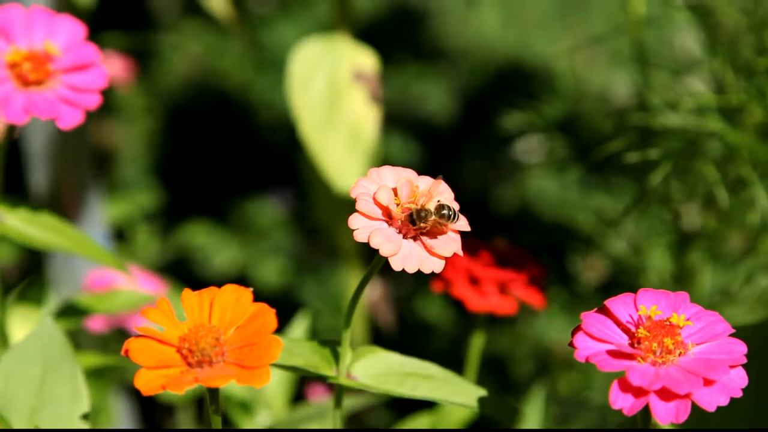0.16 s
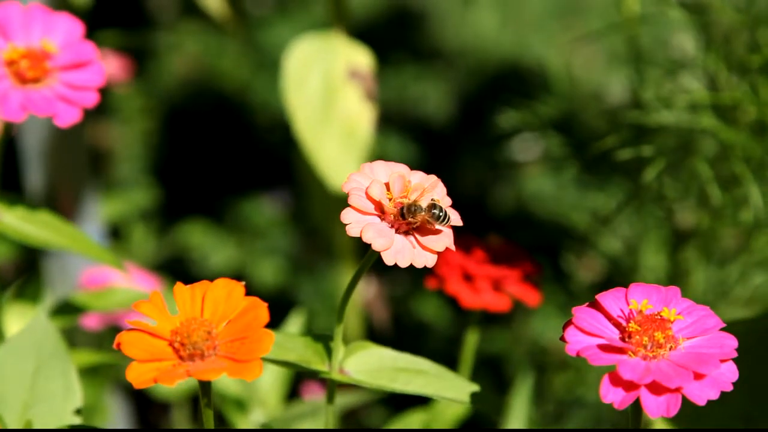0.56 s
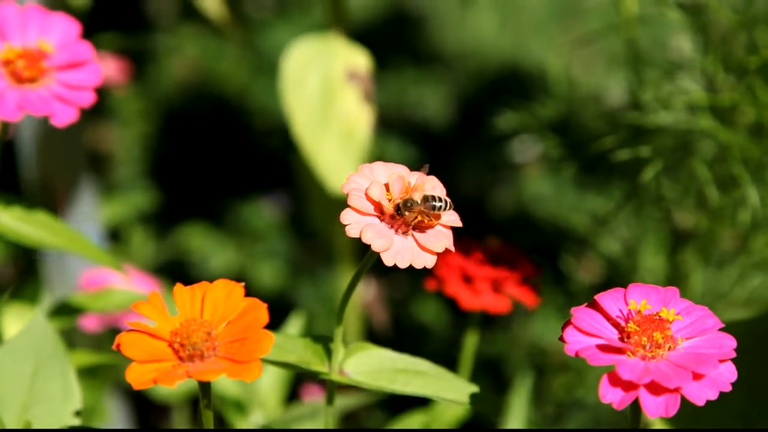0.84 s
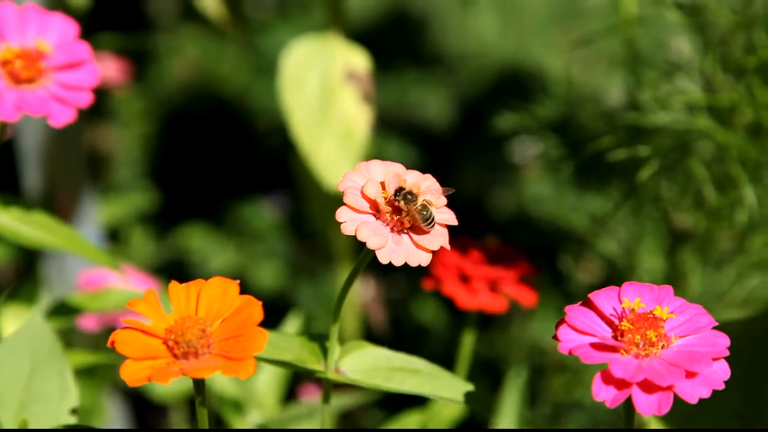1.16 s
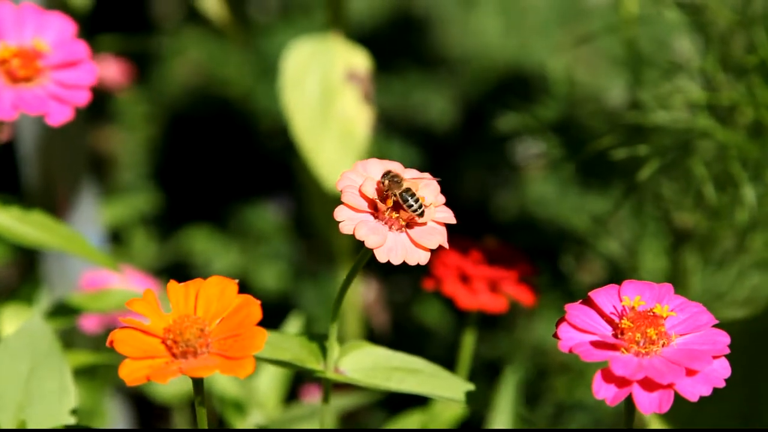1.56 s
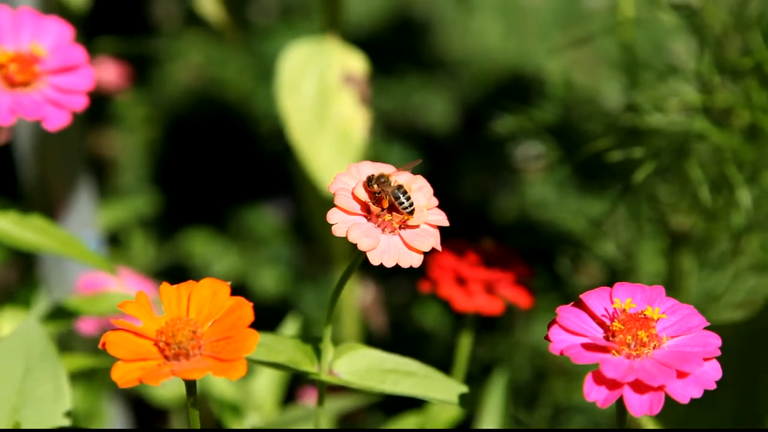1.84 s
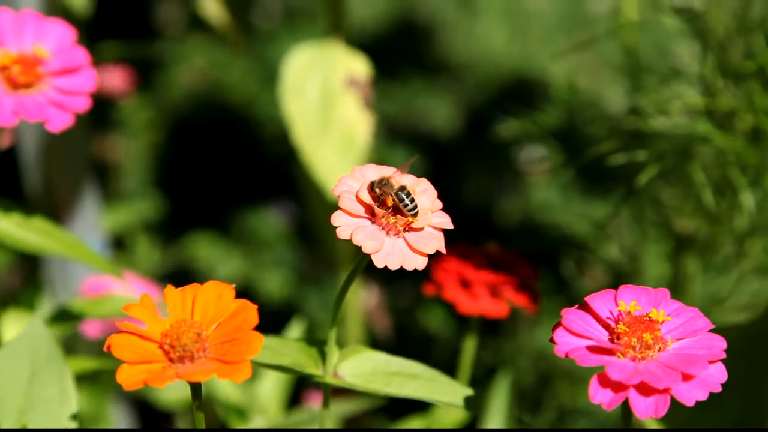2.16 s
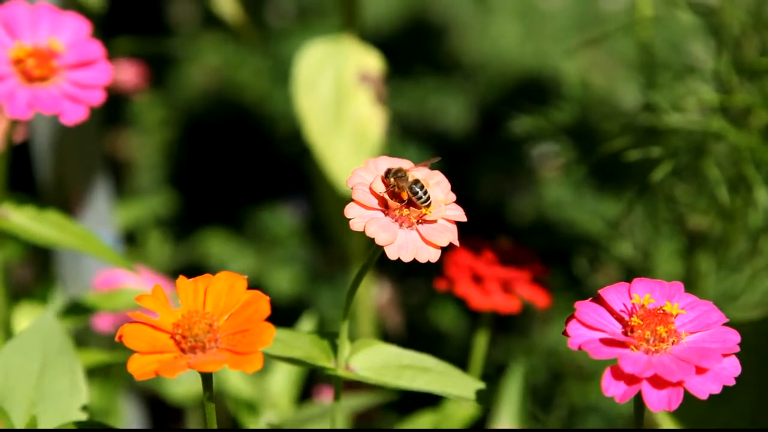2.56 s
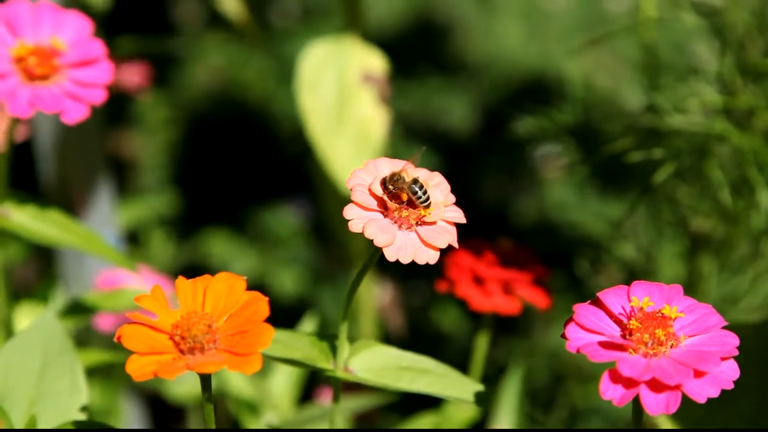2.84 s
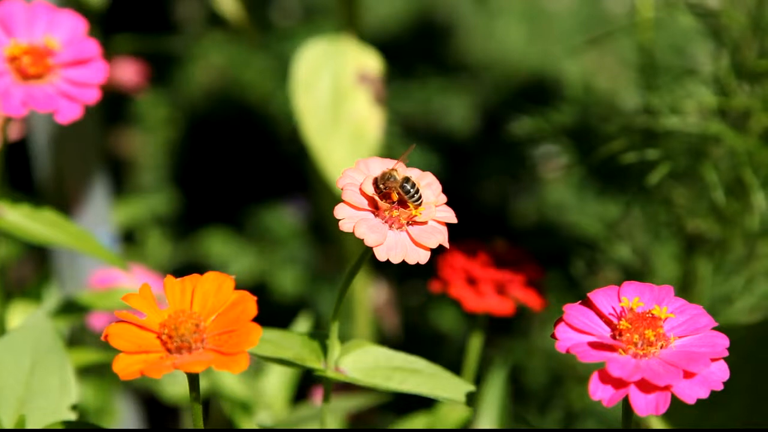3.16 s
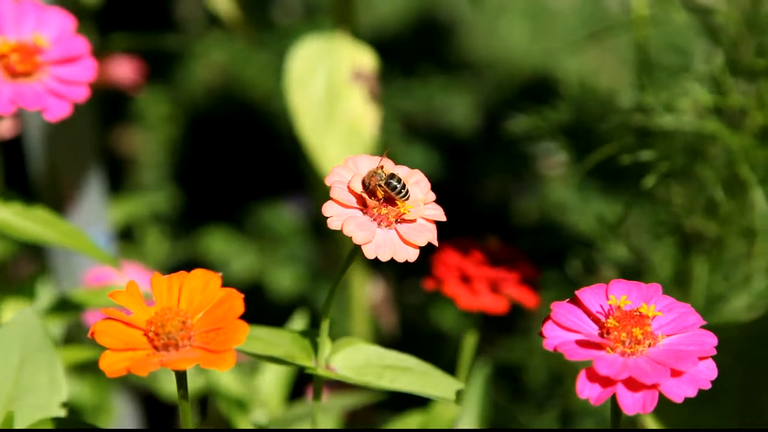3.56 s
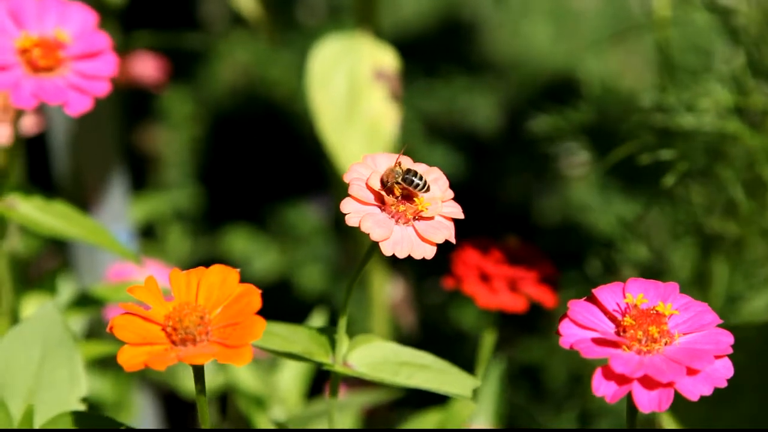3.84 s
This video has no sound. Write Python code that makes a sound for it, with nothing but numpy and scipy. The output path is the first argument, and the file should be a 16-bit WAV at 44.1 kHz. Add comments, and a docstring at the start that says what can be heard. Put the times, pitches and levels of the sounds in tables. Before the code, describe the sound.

A loud, close cicada buzzes shrilly, stops dead after a second, leaving faint camera whirring and ticking.

```python
"""From the start, a camera's lens drive whirs (noise through resonances) and ticks (short bursts of noise),
with a thin whine and two steady tones (sines), far insects, traffic, a low hum and hiss (filtered noise).
Almost at once a close cicada buzzes, about fifty syllables a second, each a volley of clicks echoed by foliage.
It slows and stops dead after about a second; the whine cuts out halfway.
Later a soft bump and its rebound ring the camera body; at the very end the cicada softly starts again."""
import sys
import numpy as np
from scipy import signal
from scipy.fft import rfft, irfft
from scipy.io import wavfile
from scipy.ndimage import uniform_filter1d, minimum_filter1d

SR = 44100
rng = np.random.default_rng(int(sys.argv[2]) if len(sys.argv) > 2 else 0)


def digitize_waveform(pressure):
    """Quantize a signal to 16-bit integers and store it at the path in sys.argv[1].

    Rows of a 2-D input are taken as channels; values are limited to [-1, 1].
    """
    field = np.atleast_2d(pressure).T
    bounded = np.clip(field, -1, 1)
    quanta = np.round(bounded * 32767).astype(np.int16)
    wavfile.write(sys.argv[1], SR, quanta)


N = 176400

# Lens housing resonances: pitch_hz, width_hz, whir_level_db, tick_level_db (levels compare the rows)
HOUSING = [(1596, 118, -1, -10.5), (1798, 106, 0.5, 6), (1916, 83, -13.5, -10.5), (2225, 122, -4.5, -2),
           (2366, 104, -8.5, -2), (2551, 190, -4, -11), (2995, 89, -11, -3), (3334, 290, -13.5, 7),
           (3670, 226, -2.5, 9), (4085, 250, -18, -1), (4510, 530, -9, 3)]
# Loudness of the whir before its flutter: time_s, level_db
WHIR_LEVEL = [(0, -49), (.7, -49), (1.3, -47), (1.7, -48), (2.1, -46.5), (2.9, -48), (3.4, -47.5), (4, -46)]
WHIR_FLUTTER_DB, WHIR_FLUTTER_PER_S = 1.91, 45
# The lowest housing resonance throbs on its own
DRONE_HZ, DRONE_WIDTH_HZ, DRONE_THROB_DB, DRONE_THROB_PER_S = 1298, 124, 1.6, 30
# Loudness of that drone: time_s, level_db
DRONE_LEVEL = [(0, -52.5), (.45, -52), (.6, -57), (.8, -51.5), (.92, -46), (1.01, -44), (1.07, -54.5),
               (1.13, -48), (1.3, -47), (1.6, -51.5), (1.85, -52.5), (2.12, -48), (2.38, -53.5),
               (2.7, -49.5), (2.88, -48.5), (3.2, -51.5), (3.55, -49), (3.68, -46), (3.8, -50), (4, -51.5)]
# Small corrections of the lens drive, before the trim TICK_DB: start_s, level_db
TICKS = [(0.1077, -52), (0.131, -32.5), (0.3056, -38), (0.4, -34.5), (0.6029, -36), (0.634, -33),
         (0.7308, -36.5), (0.816, -36.5), (1.0409, -38), (1.129, -37), (1.1593, -33.5), (1.3334, -35),
         (1.3678, -35.5), (1.4132, -37), (1.4517, -32), (1.5882, -35.5), (1.748, -33), (1.8382, -39),
         (1.951, -34), (2.015, -34.5), (2.0397, -30.5), (2.1924, -35), (2.263, -30.5), (2.3442, -33.5),
         (2.3524, -35), (2.4053, -36.5), (2.4914, -34.5), (2.5232, -34), (2.5674, -35.5), (2.6502, -35),
         (2.7082, -41), (2.746, -34.5), (2.9493, -36), (3.039, -33), (3.0889, -34.5), (3.131, -35),
         (3.1688, -39), (3.2586, -34), (3.3393, -37), (3.3723, -33), (3.3948, -30), (3.4104, -32),
         (3.463, -36.5), (3.5016, -37), (3.5816, -37.5), (3.7223, -35), (3.7948, -32.5), (3.9659, -36)]
TICK_S, TICK_DB, TICK_HISS_DB = 0.0068, -6, -17
# Ticks are cut above this pitch, with a quieter uncut copy added
TICK_TOP_HZ, TICK_SPILL_DB = 4660, -8

# Partials of the thin whine: pitch_hz, level_db, beat_depth (0 to 1)
WHINE = [(4775, -69, .5), (4930, -61, .1), (5195, -67.5, .5), (5378, -66, .1), (5652, -72, .7),
         (5825, -78, .3), (6062, -73, .9), (6272, -76, .3), (6525, -78, .6), (6720, -78, .6)]
WHINE_BEAT_PER_S, WHINE_WANDER_HZ = 17, 3
WHINE_END_S, WHINE_FADE_S = 2.09, .06
# Steady tones of the camera's electronics: pitch_hz, level_db
STEADY_TONES = [(1953, -69), (15674, -70)]

# Loudness of the far insects: time_s, level_db
CHORUS_LEVEL = [(0, -66), (1.8, -64), (2.3, -60), (3, -60), (4, -58.5)]
CHORUS_HZ, CHORUS_WIDTH_HZ = 7310, 740
# Loudness of the distant traffic: time_s, level_db
TRAFFIC_LEVEL = [(0, -77), (1.0, -69), (1.5, -64), (2.5, -67), (2.95, -61), (3.4, -60.5), (4, -65)]
TRAFFIC_HZ, TRAFFIC_WIDTH_HZ = 504, 304
# Loudness of the low hum: time_s, level_db
HUM_LEVEL = [(0, -60.5), (1.0, -62), (1.8, -57.5), (2.4, -59), (3, -61.5), (4, -63)]
HUM_HZ, HUM_WIDTH_HZ = 57.4, 36
# Colour of the outdoor air noise: pitch_hz, level_db (compares the rows; AIR_DB sets the loudness)
AIR_COLOUR = [(20, -37), (35, -14), (55, -12.5), (80, -5.5), (130, -4), (220, -9.5), (400, -11),
              (600, -13.5), (900, -13.5), (2500, -13), (5000, -25.5), (6300, -19), (9000, -25),
              (12000, -30), (15500, -32)]
AIR_DB = -53.5

# Speed of the cicada's song: time_s, syllables_per_s
SONG_RATE = [(0.0, 51.5), (0.15, 51.4), (0.42, 51.0), (0.69, 50.3), (0.9, 48.8), (1.07, 45.5)]
FIRST_S, STOP_S = .0095, 1.075
# Loudness of the song: time_s, level_db
SONG_LEVEL = [(0, -20), (.3, -20), (.55, -20), (.7, -21), (.9, -19.5), (1.07, -20)]
RESTART_S, RESTART_PER_S, RESTART_DB = 3.932, 56, -49.5
# Ribs of the tymbal (the sound-making plate) buckling in turn: time_from_syllable_middle_ms, level_db
RIBS = [(-5.5, -5), (-3.5, -2.5), (-2.5, -1.5), (-2.0, -3), (-1.03, -2.5), (-0.04, 4), (0.9, 0),
        (1.9, -2.5), (2.5, -7)]
RIB_JITTER_MS, RIB_SCATTER_DB, SYLLABLE_JITTER_MS, SYLLABLE_SCATTER_DB = .2, .9, .45, .4
# Each click glides down in pitch as the rib gives way
CLICK_GLIDE_MS_PER_KHZ = .3
# Colour of one click: pitch_hz, level_db
TYMBAL_COLOUR = [(2500, -60), (4000, -64), (4700, -31.5), (5900, -23), (6250, -12.5), (6650, -13.5),
                 (7100, -3), (7500, -2), (8200, -3), (8700, -10.5), (9300, -11), (10150, -12.5),
                 (10600, -22), (11200, -27.5), (12200, -36.5), (13200, -31.5), (13600, -41), (14700, -40),
                 (15400, -37)]
# Ringing of the hollow abdomen, before ABDOMEN_DB: pitch_hz, width_hz, level_db
ABDOMEN = [(7525, 130, 0), (8020, 260, -8), (9292, 120, 2)]
ABDOMEN_DB = 2
# Reflections from near stems and leaves: delay_s, time_to_fall_60_db_s, level_db
NEAR_ECHO = (.002, .07, -6.5)
# Reflections from the garden: delay_s, time_to_fall_60_db_s, level_db
FAR_ECHO = (.025, 0.27, -15)

# A bump on the camera and its rebound: start_s, level_db
BUMPS = [(2.8815, -29), (2.8955, -37)]
# Ringing modes of the camera body: pitch_hz, time_to_fall_60_db_s, level_db
BODY = [(65, 0.11, -26), (207, 0.024, -0.5), (278, 0.065, -0.5), (640, 0.043, -8.5), (790, 0.04, -6),
        (890, .02, -10)]
BUMP_CONTACT_S = .0012
# Echo of the bump: delay_s, time_to_fall_60_db_s, level_db
BUMP_ECHO = (0.029, 0.39, -12)

# The camera's fast limiter, and the highest pitch let through
LIMIT_DB, LIMIT_S, TOP_HZ = -6.8, .002, 15720


def undb(db):
    """Turn decibels into a plain multiplier."""
    return 10 ** (np.asarray(db) / 20)


def unit(x):
    """Scale to an rms (average strength) of 1."""
    return x / np.sqrt(np.mean(x ** 2))


def curve(rows, t=None):
    """Draw straight lines through (time_s, value) rows."""
    if t is None:
        t = np.arange(N) / SR
    return np.interp(t, *np.array(rows, float).T)


def walk(rate):
    """Wander smoothly at random, turning about rate times a second, with rms 1."""
    smoothing = max(int(SR / rate), 2) // 2
    knots = rng.standard_normal(2048)
    path = np.interp(np.arange(N) / SR * rate, np.arange(len(knots)), knots)
    return unit(uniform_filter1d(path, smoothing))


def band(x, hz, width):
    """Pass one resonance, with gain 1 at its centre."""
    return signal.lfilter(*signal.iirpeak(hz, hz / width, fs=SR), x)


def steep(x, hz, width):
    """Pass the same resonance twice, so sound on either side falls away faster."""
    return band(band(x, hz, width), hz, width)


def colour(x, points):
    """Shape the tone through (pitch_hz, level_db) points without any sound before its cause."""
    size = 2 * N
    hz, db = np.array(points, float).T
    f = np.maximum(np.arange(N + 1) * SR / size, 1)
    log_gain = np.log(undb(np.interp(np.log(f), np.log(hz), db)))
    # Folding the cepstrum onto positive times makes the filter causal
    cepstrum = irfft(log_gain)
    cepstrum[1:N] *= 2
    cepstrum[N + 1:] = 0
    return irfft(rfft(x, size) * np.exp(rfft(cepstrum)))[:N]


def clicks(times, gains):
    """Place single-sample clicks at the given times in seconds."""
    at = np.round(np.ravel(times) * SR).astype(int)
    keep = (at >= 0) & (at < N)
    return np.bincount(at[keep], np.ravel(gains)[keep], N)


def echo(x, delay, t60, db):
    """Scattered reflections arrive after a delay and die away."""
    t = np.arange(SR // 2) / SR
    decay = np.exp(-np.log(1000) * t / t60)
    tail = rng.standard_normal(len(t)) * (t > delay) * decay
    return undb(db) * signal.fftconvolve(x, tail / np.linalg.norm(tail))[:N]


def lens():
    """The lens drive rubs steadily and jerks in short rasps; both sound through the housing."""
    t = np.arange(N) / SR
    jerks = 0
    for start, db in TICKS:
        progress = np.clip((t - start) / TICK_S, 0, 1)
        jerks = jerks + undb(db + TICK_DB) * np.sqrt(np.abs(np.sin(np.pi * progress)))
    rub = rng.standard_normal(N) * undb(WHIR_FLUTTER_DB * walk(WHIR_FLUTTER_PER_S))
    rasp = rng.standard_normal(N) * jerks

    whir, ticks = 0, 0
    for k, (hz, width, whir_db, tick_db) in enumerate(HOUSING):
        # Each resonance hears the rub 1 ms after the one before
        shifted_rub = np.roll(rub, k * SR // 1000)
        whir = whir + undb(whir_db) * unit(steep(shifted_rub, hz, width))
        ticks = ticks + undb(tick_db) * unit(steep(rasp, hz, 2 * width))
    whir = undb(curve(WHIR_LEVEL)) * unit(whir)

    low_pass = signal.ellip(6, 1, 50, TICK_TOP_HZ, fs=SR, output="sos")
    ticks = signal.sosfilt(low_pass, ticks) + undb(TICK_SPILL_DB) * ticks
    ticks = unit(ticks) * np.sqrt(np.mean(jerks ** 2))
    tick_hiss = undb(TICK_HISS_DB) * band(rasp, 6800, 6500)

    throb = undb(DRONE_THROB_DB * walk(DRONE_THROB_PER_S))
    drone = unit(steep(rng.standard_normal(N) * throb, DRONE_HZ, DRONE_WIDTH_HZ))
    return whir + ticks + tick_hiss + drone * undb(curve(DRONE_LEVEL))


def whines():
    """A thin whine of wandering, beating sines cuts out halfway; two faint sines hold steady."""
    t = np.arange(N) / SR
    whine = 0
    for hz, db, depth in WHINE:
        beat = np.sin(2 * np.pi * (WHINE_BEAT_PER_S * t + rng.random()))
        cycles = np.cumsum(hz + WHINE_WANDER_HZ * walk(29.3)) / SR
        whine = whine + undb(db) * (1 + depth * beat) * np.sin(2 * np.pi * cycles)
    fade = np.clip((WHINE_END_S - t) / WHINE_FADE_S, 0, 1)
    steady = sum(undb(db) * np.sin(2 * np.pi * hz * t) for hz, db in STEADY_TONES)
    # The square root of 2 makes the table levels rms levels
    return np.sqrt(2) * (whine * fade + steady)


def swell(hz, width, db):
    """Noise through one steep resonance follows a loudness curve."""
    return unit(steep(rng.standard_normal(N), hz, width)) * undb(db)


def garden():
    """Far insects and traffic swell in over the low hum and hiss of the open air."""
    chorus = swell(CHORUS_HZ, CHORUS_WIDTH_HZ, curve(CHORUS_LEVEL) + 1.0 * walk(60))
    traffic = swell(TRAFFIC_HZ, TRAFFIC_WIDTH_HZ, curve(TRAFFIC_LEVEL) + 1.5 * walk(6.9))
    hum = swell(HUM_HZ, HUM_WIDTH_HZ, curve(HUM_LEVEL))
    air = unit(colour(rng.standard_normal(N), AIR_COLOUR)) * undb(AIR_DB + 0.51 * walk(1.95))
    return chorus + traffic + hum + air


def glide(x, ms_per_khz):
    """Spread each click into a short falling tone: pitches below the main ring arrive later."""
    khz_from_ring = (np.arange(N + 1) * SR / (2 * N) - ABDOMEN[0][0]) / 1000
    turn = np.exp(1j * np.pi * ms_per_khz * khz_from_ring ** 2)
    return irfft(rfft(x, 2 * N) * turn)[:N]


def tymbal(x):
    """Clicks take the glide and colour of the tymbal and ring the hollow abdomen."""
    x = colour(glide(x, CLICK_GLIDE_MS_PER_KHZ), TYMBAL_COLOUR)
    ringing = sum(undb(db) * band(x, hz, width) for hz, width, db in ABDOMEN)
    return x + undb(ABDOMEN_DB) * ringing


def cicada():
    """Each muscle pull buckles the ribs in a quick volley; foliage fills the gaps and rings on after the stop."""
    t = np.arange(N) / SR
    # Count syllables along the song; each whole number marks one
    phase = np.cumsum(curve(SONG_RATE) * (t > FIRST_S)) / SR
    last = int(np.interp(STOP_S, t, phase))
    song = np.maximum(np.interp(np.arange(last + 1), phase, t), FIRST_S)
    restart = RESTART_S + np.arange(0, 6) / RESTART_PER_S
    times = np.r_[song, restart]
    levels = np.r_[curve(SONG_LEVEL, song), np.full(len(restart), RESTART_DB)]

    rib_ms, rib_db = np.array(RIBS).T
    # Chance in time and level, per syllable and per rib
    pull = rng.standard_normal((len(times), 2))
    rib = rng.standard_normal((len(times), 2, len(RIBS)))
    offset_ms = rib_ms + RIB_JITTER_MS * rib[:, 0] + SYLLABLE_JITTER_MS * pull[:, :1]
    db = levels[:, None] + rib_db + RIB_SCATTER_DB * rib[:, 1] + SYLLABLE_SCATTER_DB * pull[:, 1:]
    direct = tymbal(clicks(times[:, None] + offset_ms / 1000, undb(db)))
    wet = direct + echo(direct, *NEAR_ECHO) + echo(direct, *FAR_ECHO)
    # Scale the song to the average power of the syllable levels
    return wet * np.sqrt(np.mean(undb(levels) ** 2) / np.mean(wet[t < STOP_S] ** 2))


def bump():
    """A soft knock and its rebound ring the camera body, each mode dying at its own speed."""
    t = np.arange(SR // 4) / SR
    ring = 0
    for hz, t60, db in BODY:
        ring = ring + undb(db) * np.cos(2 * np.pi * hz * t) * np.exp(-np.log(1000) * t / t60)
    # A smooth push makes the contact soft
    push = np.sin(np.pi * np.minimum(t / BUMP_CONTACT_S, 1)) ** 2
    soft_ring = signal.fftconvolve(ring, push / push.sum())
    start, db = np.array(BUMPS).T
    knock = signal.fftconvolve(clicks(start, undb(db)), soft_ring)[:N]
    return knock + echo(knock, *BUMP_ECHO)


def scene():
    """Add everything at one microphone."""
    return (lens() + whines() + garden() + cicada() + bump())[None]


def record(dry):
    """The camera holds down the loudest peaks and cuts the top."""
    envelope = np.abs(signal.hilbert(dry))
    size = int(LIMIT_S * SR)
    needed = np.minimum(undb(LIMIT_DB) / (envelope + 1e-9), 1)
    # Hold the lowest gain nearby, then smooth it
    gain = uniform_filter1d(minimum_filter1d(needed, size), size)
    low_pass = signal.ellip(12, .1, 90, TOP_HZ, fs=SR, output="sos")
    return signal.sosfilt(low_pass, dry * gain)


dry = scene()
out = record(dry)
digitize_waveform(out)
```